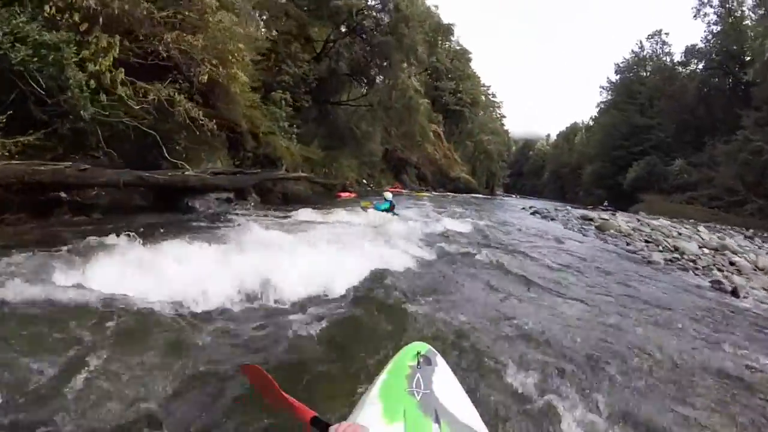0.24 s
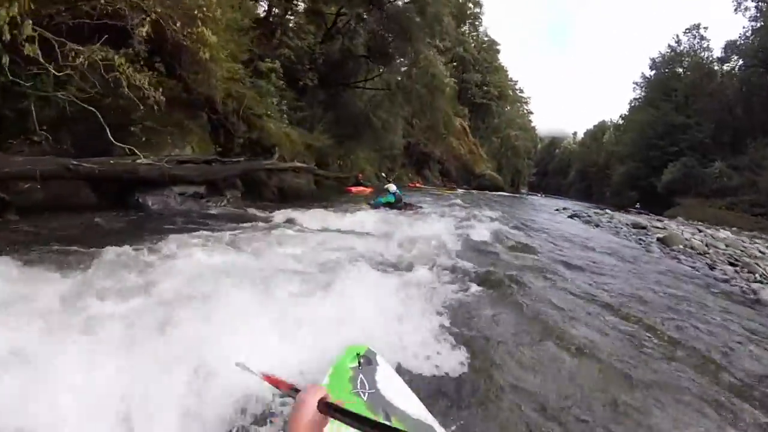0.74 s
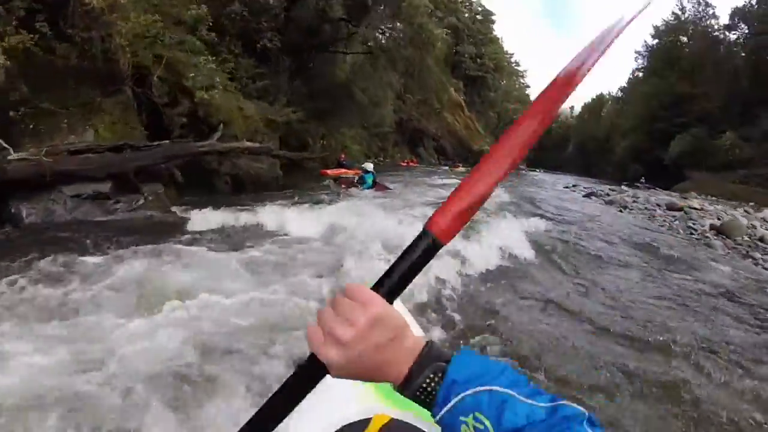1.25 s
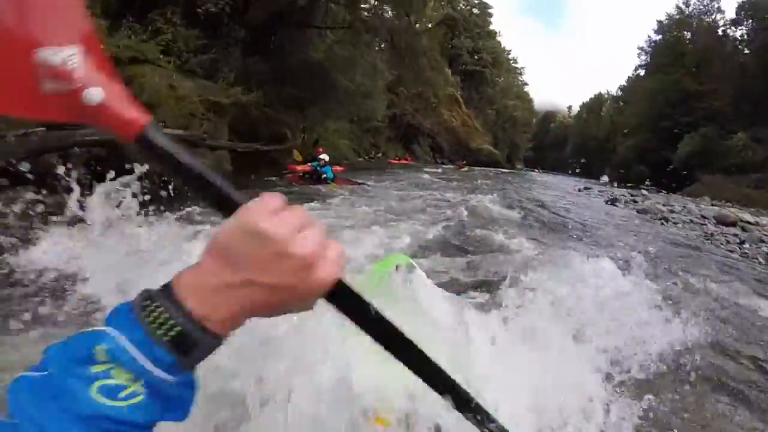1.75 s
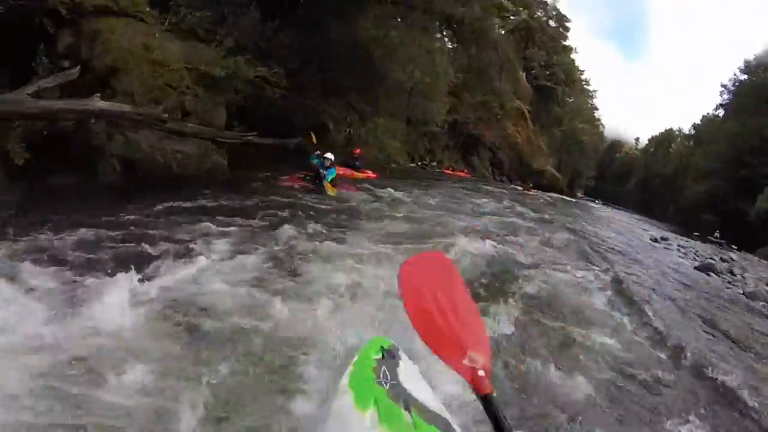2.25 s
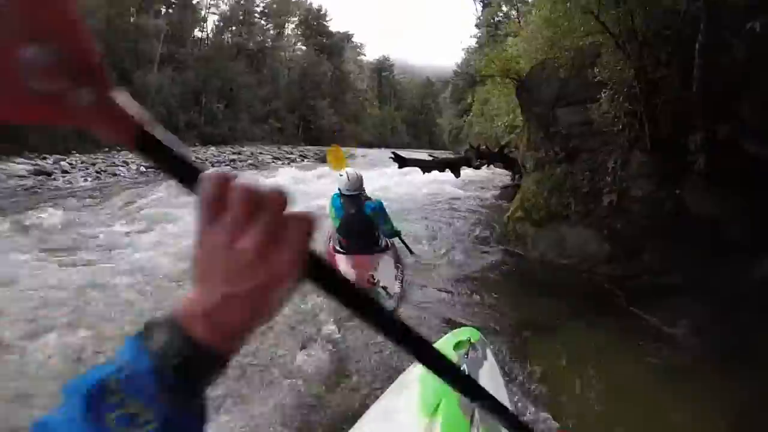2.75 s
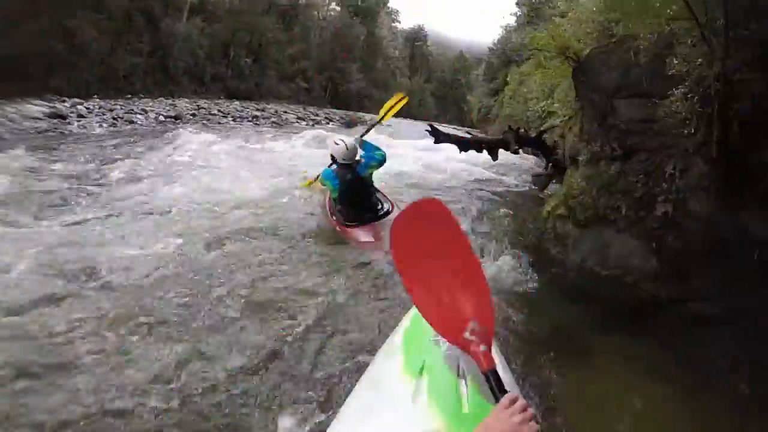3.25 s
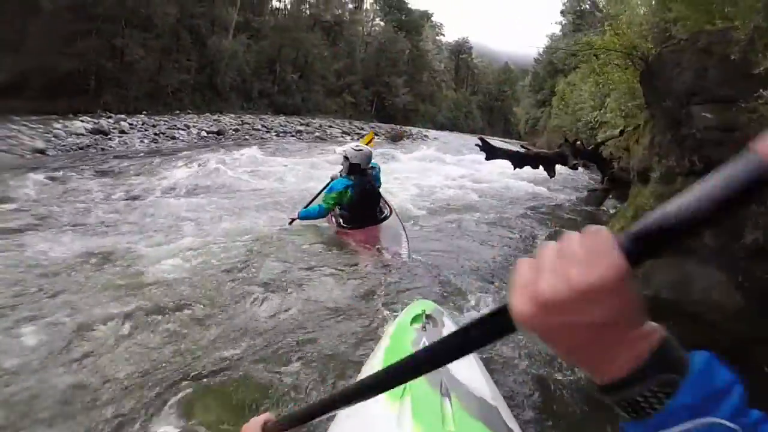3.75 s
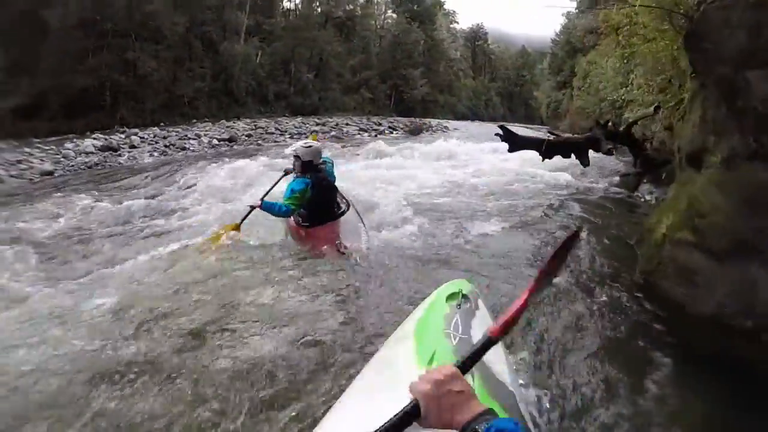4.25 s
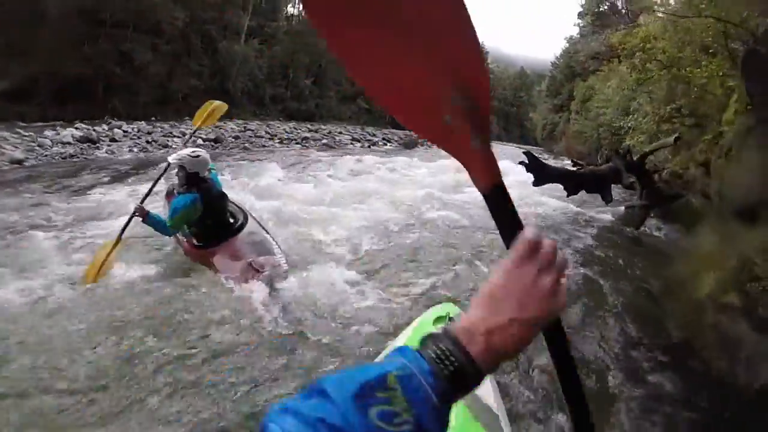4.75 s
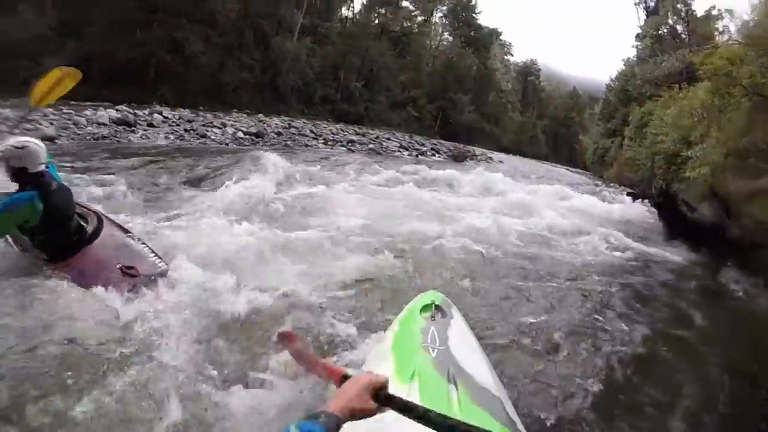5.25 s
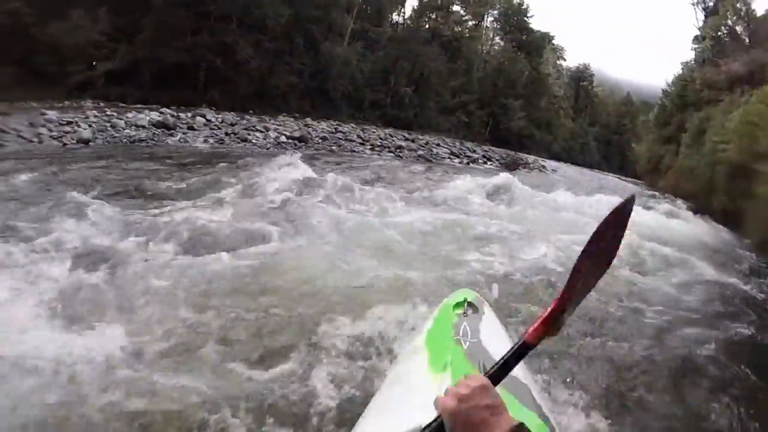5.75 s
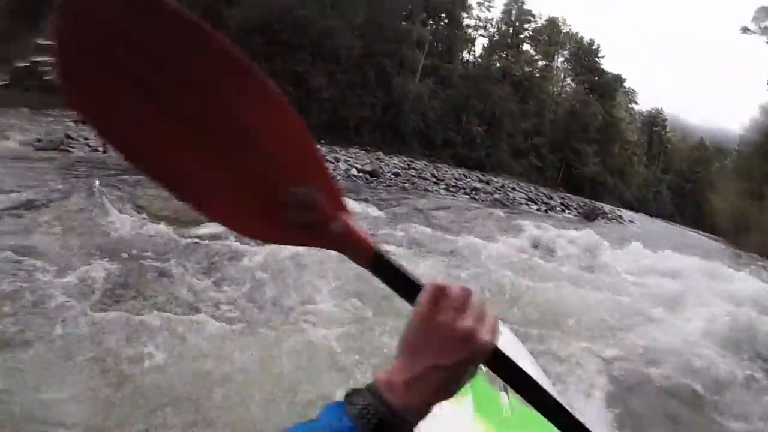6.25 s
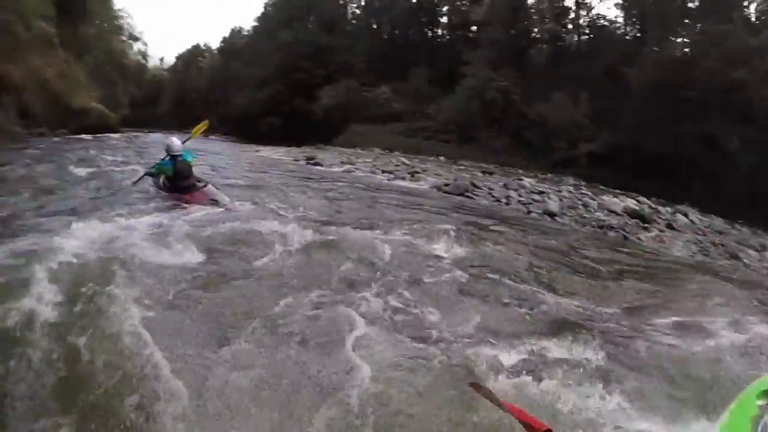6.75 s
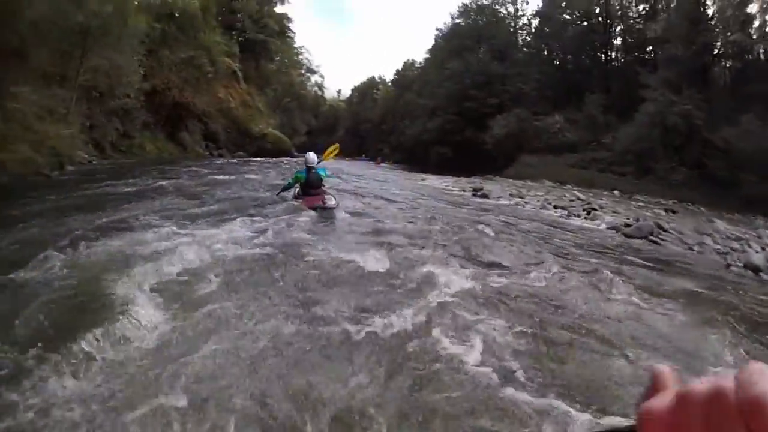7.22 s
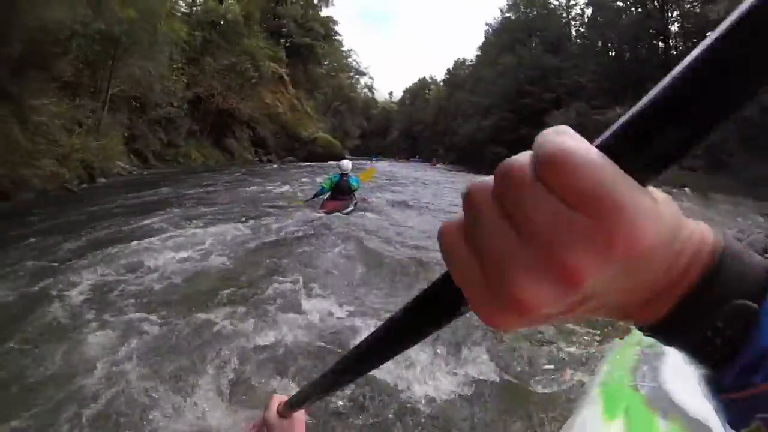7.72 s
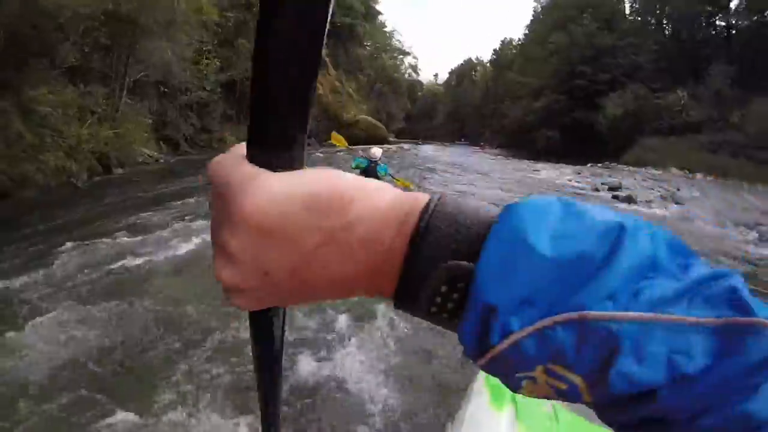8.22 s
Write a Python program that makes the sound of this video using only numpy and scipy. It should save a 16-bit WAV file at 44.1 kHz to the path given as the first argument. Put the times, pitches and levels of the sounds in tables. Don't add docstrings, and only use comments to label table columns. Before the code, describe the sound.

Loud whitewater rushes and hisses around a kayak, surging with waves and paddle strokes, then drops abruptly to a calmer, bubbling flow and gradually swells again.

```python
import sys
import numpy as np
from scipy import signal
from scipy.fft import rfft, irfft
from scipy.io import wavfile
from scipy.ndimage import uniform_filter1d

SR = 44100
rng = np.random.default_rng(int(sys.argv[2]) if len(sys.argv) > 2 else 0)


def volts_from_db(level):
    exponent = np.asarray(level, float) / 20
    return 10 ** exponent


def file_out(sig):
    cols = np.atleast_2d(sig).T
    lim = np.clip(cols, -1, 1)
    pcm = np.round(lim * 32767).astype(np.int16)
    wavfile.write(sys.argv[1], SR, pcm)


N = 373968

LAYER_EDGES_HZ = [1150, 3800, 7200]
BUBBLE_DB = [-40, -10, -7, -8]
PATCH_DB = [.6, .7, .9, 1.3]
# (time [s], turn [dB], nod as churn slope [dB per octave], lean [dB])
FACING = [(0.0, 1, -0.8, 0), (0.2, -6.5, -0.3, -5), (0.86, -2, -3.5, -4), (1.05, 3.5, -2.5, -1),
          (1.44, 3, 2, -.8), (1.52, -3.5, -0.5, -1), (1.9, -0.5, 2, 1), (2.1, 1.5, 1.1, -2.2),
          (2.58, 0.5, 0.5, -1), (2.95, 3.5, -2.5, 1), (3.3, 0.3, 0.2, 0), (5.0, 0.5, -0.2, 0),
          (5.3, -3.5, -1.5, -3), (5.95, -2, -1, 2), (6.4, 0, -1.1, 2), (6.7, 3, 2.2, 2), (7.5, 1, .4, -0.5),
          (8.48, 1.5, 1.1, 3)]
TILT_SHARES = [(0.013, .01, 0.011), (.01, 0.95, .01), (0.2, .01, .01), (.05, 0.33, .01)]


def whitewater():
    layers = np.zeros((4, N))
    white = rng.standard_normal((2, N))
    surge = 0.19 * drift(9.4) + 0.5 * drift(40.0)
    drops = rms_one(grains(300 * volts_from_db(4.0 * surge), 1.9))
    tilts = np.dot(TILT_SHARES, in_time([FACING]))
    pivots_hz = [400, 1900, 5000, 10000]
    edges = 94 * 2 ** (np.arange(24) / 3)
    for k, (low, high) in enumerate(zip(edges, np.minimum(edges[1:], 19000))):
        hz = np.sqrt(low * high)
        layer = np.searchsorted(LAYER_EDGES_HZ, hz)
        flicker = surge + 0.6 * drift(4.4) + 0.39 * drift(30.0)
        foam = band(white[k % 2] + volts_from_db(BUBBLE_DB[layer] - 31.0) * drops, low, high)
        born = grains(0.03 * hz * volts_from_db(4.5 * flicker), 2.2)
        bubbles = rms_one(resonance(born, hz, hz / 16.3)) * np.sqrt((high - low) / SR * 2)
        tilt_db = tilts[layer] * np.log2(hz / pivots_hz[layer])
        gain = volts_from_db(PATCH_DB[layer] * flicker + tilt_db)
        layers[layer] += gain * (foam + volts_from_db(BUBBLE_DB[layer]) * bubbles)
    heard = aimed(through_case(layers))
    return sum(volts_from_db(db + 0.43) * evened(x, 0.23) for db, x in zip(river_levels(), heard))


# (time [s], vigour as churn level [dB], fineness [dB])
FLOW = [(0.0, -38.5, 0), (0.15, -40.5, 1), (0.6, -37.5, 3.5), (1.1, -38, 1), (1.45, -35.5, -2),
        (2.1, -37, 4), (2.58, -36.5, -1.5), (2.6, -45.5, 0.5), (3.0, -46.5, -1), (3.5, -44, 0),
        (3.9, -46, -2), (4.7, -44.5, -2), (5.2, -41.5, 0.5), (5.9, -42, 2.5), (6.2, -46, 2.5),
        (6.65, -42.5, -1.8), (7.5, -41.0, -4.5), (8.48, -39.5, -4)]
# (time [s], spray thrown [dB], water moved [dB], length [s])
SURGES = [(0.228, 2.3, 3.5, 1), (0.669, 4.5, 3, 0.13), (0.79, 4, 4.5, 0.3), (1.013, 1.5, 4, 0.22),
          (1.45, 3.5, 1.5, 0.26), (1.815, 9.5, 3, 0.12), (1.954, 1.5, 6.5, 0.19), (2.189, 5, 3.5, 0.13),
          (2.319, 5, -1, 0.074), (2.96, 9, 3, 0.11), (3.09, 6, 4.5, 0.17), (3.481, 0, 2, 0.35),
          (3.885, 8, 4, 0.27), (4.127, 3, 4.5, 0.28), (4.708, 5.5, 0.5, 0.19), (5.02, -2, 2, 0.25),
          (5.27, 4.5, 2.5, 0.12), (5.62, 2.3, 3, 0.23), (5.759, 4, -6, 0.078), (6.011, 2.5, 5.5, 0.17),
          (6.252, 9.5, 2.9, 0.16), (6.353, 4.5, -1.5, 0.13), (6.63, 8.5, 0, 0.3), (6.712, -2, 6, 0.077),
          (6.94, 3, 1.5, 0.48), (7.18, 3.5, 1, 0.24), (7.57, 7.5, -4, 0.16), (7.735, 7, 3.6, 0.14),
          (8.018, 5, -3, 0.11), (8.26, 2, 2.5, 0.4)]
# (usual level [dB], share of vigour [1], of fineness [1], of spray [1], of water [1])
FOLLOWS = [
    (-54, 0.78, 0.011, .01, 0.91),
    (-40, 1.005, .01, 0.28, 0.34),
    (-45.5, 1.17, 0.66, 0.71, .01),
    (-58.5, 1.29, 0.62, 0.84, .01),
]
USUAL_DB = -40


def river_levels():
    vigour_db, fine_db = in_time([FLOW])
    thrown_db, moved_db = np.zeros(N), np.zeros(N)
    t = np.arange(SR) / SR
    attack_s = 0.063
    for s, spray_db, water_db, length in SURGES:
        start = int(s * SR)
        shape = (1 - np.exp(-(t / attack_s) ** 2)) * np.exp(-(t / length) ** 2)
        shape = shape[:N - start]
        thrown_db[start:][:SR] += spray_db * shape
        moved_db[start:][:SR] += water_db * shape
    return np.array(FOLLOWS) @ [np.ones(N), vigour_db - USUAL_DB, fine_db, thrown_db, moved_db]


# (frequency [Hz], level [dB])
CASE = [(100, -20), (310, -16), (420, -18.5), (1000, -22), (1150, -20.5), (1330, -12.5), (2600, -14.5),
        (3000, -20.5), (3700, -20), (6300, -19), (7400, -30), (10500, -28.5), (14000, -41), (15300, -44)]
# (frequency [Hz], width [Hz], level [dB])
CAVITIES = [(1570, 470, 6), (1550, 127, 3), (4400, 140, 2.5), (2110, 290, 3.5), (2420, 250, 3),
            (3696, 134, -3.5), (4380, 1020, 5.5), (4960, 210, 5), (5510, 930, 4), (6230, 150, 0.5),
            (8500, 2600, 2.5), (10580, 1250, -5.5), (12900, 2500, 3)]


def through_case(x, size=8192):
    hz = np.maximum(np.arange(size // 2 + 1) * SR / size, 1)
    wall_hz, wall_db = np.transpose(CASE)
    level_db = np.interp(np.log(hz), np.log(wall_hz), wall_db)
    for f, width, db in CAVITIES:
        level_db = level_db + db * np.exp(-(2 * (hz - f) / width) ** 2)
    cepstrum = irfft(np.log(volts_from_db(level_db)))
    cepstrum[1:size // 2] *= 2
    response = irfft(np.exp(rfft(cepstrum[:size // 2], size)))
    return signal.fftconvolve(x, response[None])[:, :N]


# (frequency [Hz], width [Hz], share of turn [1], of nod [1], of lean [1])
AIMED = [(1530, 140, -0.09, -0.29, 0.093), (2090, 150, .01, -0.23, -0.098), (4000, 330, 0.4, -0.32, -0.24),
         (4630, 1600, -0.88, .01, 0.28), (5900, 620, 1.03, .01, .01), (6630, 910, -0.52, .01, -0.3),
         (8960, 1100, .01, 0.14, 0.75), (11700, 1500, 0.15, 0.073, -0.77)]


def aimed(x):
    facing_db = in_time([FACING])
    for hz, width, *shares in AIMED:
        x = x + (volts_from_db(np.dot(shares, facing_db)) - 1) * resonance(x, hz, width)
    return x


# (time [s], peak level
# [dB], pitch [Hz])
PLOPS = [(0.293, -29, 1580), (0.369, -28, 1565), (0.4496, -28, 1550), (0.55, -30, 1550), (0.614, -27, 1670),
         (0.723, -27, 1600), (0.8043, -32, 1550), (0.8545, -28, 1650), (0.9433, -30, 1600),
         (1.0271, -33, 1520), (1.1623, -26, 1590), (1.197, -33, 1640), (1.2994, -29, 1524),
         (1.3518, -28, 1730), (1.4137, -29, 1600), (1.505, -27, 1590), (1.6057, -27, 1600),
         (1.6501, -30, 1570), (1.7659, -27, 1600), (1.8701, -22, 1530), (1.901, -28, 1570),
         (1.975, -29, 1670), (2.047, -32, 1550), (2.0795, -30, 1590), (2.1806, -32, 1550),
         (2.251, -27, 1590), (2.3201, -28, 1520), (2.393, -25.5, 1570), (2.5336, -30, 1590),
         (2.6678, -33.5, 1550), (2.8968, -39, 1590), (3.6807, -34, 1550), (5.0545, -28, 1587),
         (5.4505, -33, 1580), (5.6516, -37, 1520), (6.4244, -34, 1580), (6.817, -35, 1570),
         (7.3893, -30, 1655), (7.4624, -32, 1580), (7.8236, -30, 1560), (8.096, -36, 1660),
         (8.1864, -31, 1690), (8.2313, -33, 1610), (8.3389, -32, 1570), (8.3978, -31, 1700)]
# (time [s], peak level [dB], pitch [Hz])
GURGLES = [(1.8532, -37, 2420), (1.8692, -31, 2070), (1.8941, -33, 2330), (2.0094, -34, 2580),
           (2.0288, -32, 2600), (2.2274, -29, 2000), (2.2723, -30, 2120), (2.3057, -38, 2170),
           (2.4409, -39, 2030), (2.8965, -36.5, 1800), (3.2455, -38, 2370), (3.5523, -40, 2170),
           (4.9274, -32.5, 2330), (5.1028, -29.5, 2310), (5.1615, -30, 2410), (5.3283, -45, 2000),
           (6.742, -40, 2090), (6.775, -31, 2380), (6.788, -34, 1940), (6.81, -35, 2250),
           (6.9596, -36, 2110), (7.2245, -36, 2250), (7.2544, -30.5, 2330), (7.3777, -31, 2370),
           (7.4395, -33, 2300), (7.7049, -32, 2430), (8.085, -32, 1860), (8.105, -38, 2050),
           (8.127, -33, 1920), (8.1928, -31, 2200)]
# (time [s], peak level [dB], pitch [Hz])
DROPLETS = [(.1795, -28, 4330), (.5931, -31, 4290), (.6265, -29, 4560), (1.6492, -33, 4290),
            (1.715, -30, 4630), (2.27, -29, 5000), (1.8726, -20, 5070), (1.9095, -25, 5000),
            (1.9285, -24, 4450), (2.9976, -36, 3130), (3.1857, -32, 5470), (3.279, -35, 4410),
            (3.5419, -36, 5430), (3.947, -37, 4500), (3.9764, -36, 4380), (4.9272, -33, 4380),
            (4.9636, -36, 4400), (5.033, -36, 4380), (5.1178, -41, 5540), (5.396, -35, 4370),
            (5.486, -38, 4390), (1.515, -26, 4400), (1.555, -27, 4430), (1.59, -32, 4900),
            (6.5535, -31, 4770), (7.1567, -34, 4290), (7.1941, -36, 5530), (7.3854, -31, 4370),
            (7.5797, -33, 4400), (7.9873, -35, 4370)]
# (time [s], peak level [dB], pitch [Hz])
TICKS = [(0.4409, -46, 8580), (1.8427, -32, 8700), (1.9764, -42, 9270), (2.5386, -39, 8500),
         (2.9033, -51, 8860), (3.1817, -44, 9110), (3.2256, -45, 8400), (3.2784, -46, 8380),
         (3.6631, -44, 7760), (3.9005, -43, 7760), (3.9529, -49, 8550), (4.8514, -45, 8850),
         (5.3572, -45, 8140), (5.6181, -47, 8430), (5.6984, -41, 8500), (5.8042, -40, 8920),
         (5.9833, -48, 8150), (6.1355, -52, 8700), (6.7057, -45, 9100), (6.7491, -43, 9340),
         (7.2549, -51, 8600), (7.5133, -46, 9020), (7.6635, -44, 8650), (7.7817, -44, 8820),
         (8.1469, -42, 7670), (8.3255, -45, 9040)]
# (time [s], peak level [dB], pitch [Hz])
PINPRICKS = [(1.05, -45, 11900), (1.8262, -43, 11700), (1.8746, -45, 11400), (2.1355, -49, 12500),
             (3.05, -49.5, 11100), (3.9459, -59, 11000), (3.9634, -55, 12800), (4.817, -51, 11500),
             (5.007, -54, 10700), (5.6815, -52, 12700), (5.7977, -53, 13200), (5.8127, -58, 13200),
             (5.9544, -50, 13100), (6.6049, -52, 12900), (6.6438, -55, 11900), (6.6588, -50, 11800),
             (7.013, -52, 11700), (7.6595, -54, 13700), (7.6715, -49, 12900), (8.1898, -51, 11300)]
# (time [s], peak level [dB], pitch [Hz])
BREAKER = [(0.3326, -32, 2100), (0.5053, -35, 2380), (0.631, -28, 2060), (0.6744, -33, 2160),
           (1.0445, -27, 2050), (1.1338, -28, 2190), (1.1787, -30, 2080), (1.2605, -29, 2130),
           (1.3783, -40, 2130), (1.4381, -28, 2230), (1.496, -25, 2070), (1.552, -24, 2260),
           (1.606, -25, 2020), (1.7654, -29, 2110)]
# (time [s], peak level [dB], pitch [Hz])
SPATTER = [(2.741, -42, 5040), (3.0274, -38, 5250), (3.186, -40, 5690), (3.2793, -41, 5330),
           (3.542, -40, 5550), (4.4741, -37, 5420), (4.6901, -43, 5840), (4.9635, -35, 5900),
           (5.1176, -39, 5430), (5.2518, -38, 5520), (5.396, -37, 5060), (5.4314, -33, 5420),
           (5.7641, -35, 5200), (5.7991, -33, 5500), (6.6786, -41, 5640), (7.2762, -34, 5740),
           (7.4333, -39, 5730), (7.6134, -36, 5870), (7.7826, -38, 5100), (8.1946, -40, 5470)]


def single_bubbles():
    out = near_bubbles(PLOPS, 5.5, -5, 0.25)
    out += near_bubbles(GURGLES, 2.6, -0.5, 0.25)
    out += near_bubbles(DROPLETS, 4.5, -5, 0.8)
    out += near_bubbles(TICKS, 6.6, -5.5, 1.4)
    out += near_bubbles(PINPRICKS, 9.0, -2.5, 1.2)
    out += near_bubbles(BREAKER, 4.9, -6, 0.4)
    out += near_bubbles(SPATTER, 7.1, -6, 1.2)
    return out


def near_bubbles(rows, cycles, gain_db, rough):
    out = np.zeros(N + 2048)
    t = np.arange(2048) / SR
    for (s, db, hz), tear in zip(rows, rng.standard_normal((len(rows), 2048))):
        age = t * hz / cycles
        tone = np.sin(2 * np.pi * hz * t * (0.99 + 0.0056 * age))
        tone += rough * band(tear, 0.55 * hz, min(1.2 * hz, 19000))
        swell_and_decay = np.e * age * np.exp(-age)
        out[int(s * SR):][:2048] += volts_from_db(db + gain_db) * swell_and_decay * tone
    return out[:N]


# (time [s], peak level [dB], bright part [dB], thud part [dB])
SNAPS = [(2.8965, -39, -18, -32), (3.186, -38, -7, -20), (3.2441, -33, -14, -19), (3.9527, -36, 0, -20),
         (5.1028, -38, -19, -28), (5.1154, -42, -11, -23), (5.1387, -36, -12, -24), (5.1617, -35, -18, -31),
         (6.7527, -28, -10, -31), (6.772, -32, -8, -32), (6.7974, -31, -8, -32), (6.8174, -32, 0, -30)]


def drop_snaps():
    s, peak_db, bright_db, thud_db = np.transpose(SNAPS)
    r = np.exp(-1 / (0.003 * SR))
    out = np.zeros(N)
    parts = [(0 * s - 6, 1250, 2800), (bright_db - 9, 3000, 7000), (thud_db + 7.5, 520, 1250)]
    for db, low, high in parts:
        hits = np.zeros(N)
        hits[(s * SR).astype(int)] = volts_from_db(peak_db + db)
        out += volts_from_db(4.0) * band(hits, low, high) * SR / (high - low) / 2
        burst = signal.lfilter([1], [1, -r], hits) * rng.standard_normal(N)
        out += band(burst, low, high) * np.sqrt(SR / 2 / (high - low)) * volts_from_db(-1.5)
    return out


# (frequency [Hz], width [Hz], level [dB])
HULL = [(73, 18, 0), (96, 16, -8), (150, 60, -15), (290, 90, -17)]


def hull_boom():
    level_db = hull_level()
    knocks = grains(150, 1.0)
    boom = np.zeros(N)
    for hz, width, db in HULL:
        mode = resonance(resonance(knocks, hz, width), hz, 2 * width)
        boom += volts_from_db(db) * evened(mode, 0.047)
    return volts_from_db(level_db - 0.3) * evened(boom, 0.048)


# (time [s], level [dB], hold [s])
THUMPS = [(1.26, -55, .03), (1.503, -55.5, .05), (1.86, -46, .04), (1.924, -39.5, 0.023),
          (1.984, -39.5, 0.052), (2.225, -44, .04), (2.348, -47.5, 0.024), (3.208, -53, 0.062),
          (4.2, -57, .05), (4.775, -61, 0.21), (5.32, -47.5, 0.094), (5.57, -50.5, 0.024),
          (5.686, -57, .03), (6.074, -47.5, 0.032)]


def hull_level():
    t = np.arange(N) / SR
    rise_db_per_s, fall_db_per_s = 800, 350
    level_db = -65 + 0.19 * (in_time([FLOW])[0] - USUAL_DB) + 2.5 * drift(3.2)
    for s, db, hold in THUMPS:
        rise_db = rise_db_per_s * np.maximum(s - t, 0)
        fall_db = fall_db_per_s * np.maximum(t - s - hold, 0)
        level_db = np.maximum(level_db, db - rise_db - fall_db)
    return level_db


# (time [s], level [dB])
SWAY = [(0.0, -52.5), (0.71, -53), (1.18, -38), (1.41, -46), (1.53, -33), (1.63, -41), (2.5, -38.5),
        (2.74, -57), (2.9, -44), (3.59, -51.5), (4.23, -43.5), (4.55, -51), (5.72, -40), (5.76, -48.5),
        (6.78, -45), (7.75, -53), (8.48, -52.5)]


def helmet_sway():
    sway = band(band(rng.standard_normal(N), 6.8, 22.6), 2.3, 66.0)
    return volts_from_db(in_time([SWAY])[0] - 1.4) * evened(sway, 0.13)


def rms_one(x):
    return x / np.sqrt(np.mean(x ** 2) + 1e-20)


def evened(x, span_s):
    span = int(span_s * SR)
    power = uniform_filter1d(uniform_filter1d(x ** 2, span), span)
    return x / np.sqrt(power + 1e-20)


def in_time(tables):
    s, *columns = np.vstack(tables).T
    return [np.interp(np.arange(N) / SR, s, c) for c in columns]


def drift(rate):
    r = np.exp(-80 * np.pi * rate / SR)
    slow = signal.lfilter([1], [1, -2 * r, r * r], rng.standard_normal(N // 40 + 2002))
    slow = slow[2000:]
    return np.interp(np.arange(N) / 40, np.arange(len(slow)), rms_one(slow))


def grains(per_s, spread_db):
    sizes = volts_from_db(spread_db * np.minimum(rng.exponential(1, N), 5)) * rng.choice([-1, 1], N)
    return sizes * (rng.random(N) < per_s / SR) + 1e-18


def band(x, low_hz, high_hz):
    return signal.sosfilt(signal.butter(2, [low_hz, high_hz], "band", fs=SR, output="sos"), x)


def resonance(x, hz, width_hz):
    r = np.exp(-np.pi * width_hz / SR)
    poles = [1, -2 * r * np.cos(2 * np.pi * hz / SR), r * r]
    return signal.lfilter([(1 - r * r) / 2, 0, (r * r - 1) / 2], poles, x)


def scene():
    mix = whitewater() + single_bubbles() + drop_snaps() + hull_boom() + helmet_sway()
    return np.tile(mix, (2, 1))


def top_cut(x):
    return signal.sosfilt(signal.butter(12, 15210, fs=SR, output="sos"), x)


def record(dry):
    return top_cut(dry)


dry = scene()
out = record(dry)
file_out(out)
```